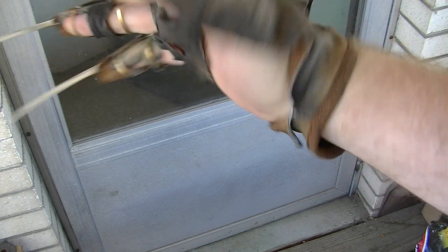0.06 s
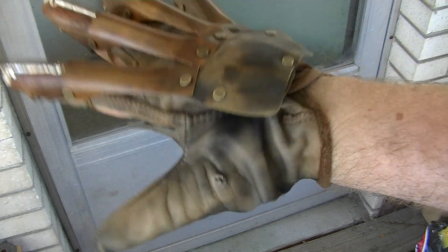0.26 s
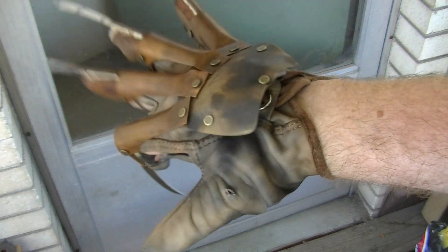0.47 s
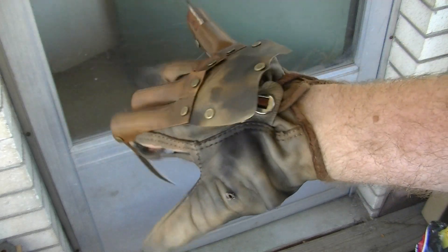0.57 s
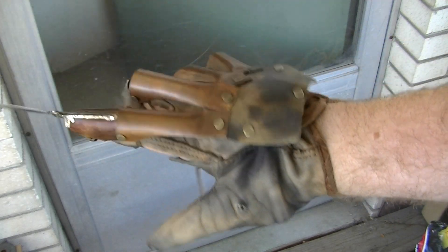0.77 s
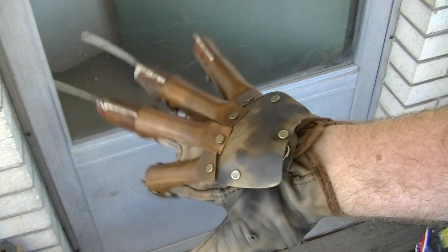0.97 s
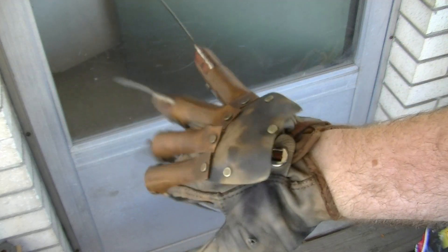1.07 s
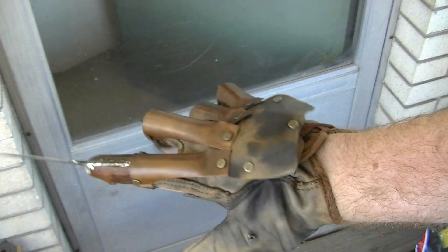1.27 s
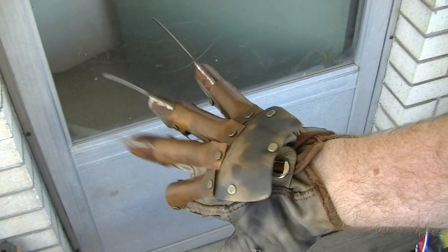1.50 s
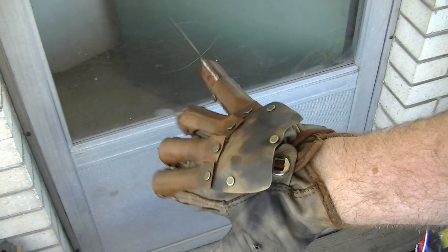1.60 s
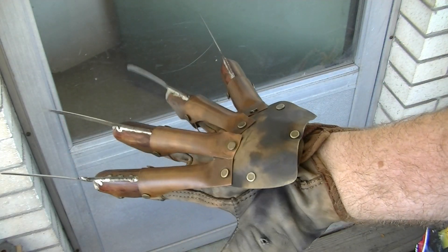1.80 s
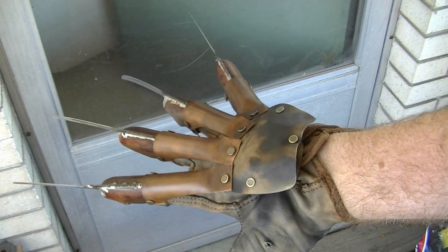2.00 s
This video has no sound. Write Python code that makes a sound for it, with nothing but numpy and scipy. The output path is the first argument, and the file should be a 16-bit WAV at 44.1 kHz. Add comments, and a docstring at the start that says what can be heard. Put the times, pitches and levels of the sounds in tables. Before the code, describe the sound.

Close metallic clacking and rattling of a bladed glove's jointed fingers, over soft outdoor air

```python
"""First come faint ticks over soft outdoor air and a low hum, then a metal-plated glove flexes close by.
Its steel blades clack, its finger plates knock and tap, and its rivets and joints tick.
Edges scrape in short stick-slip runs, and the leather crackles softly. A distant bird whistles near the end.
Each metal contact is a tiny push that sets plates and blades ringing; nearby walls add a brief echo."""
import sys
import numpy as np
from scipy import signal
from scipy.fft import rfft, irfft
from scipy.io import wavfile
from scipy.ndimage import map_coordinates

SR = 44100
rng = np.random.default_rng(int(sys.argv[2]) if len(sys.argv) > 2 else 0)


def store_wav(level_fs):
    """Save 16-bit WAV to argv[1]."""
    pcm = np.round(np.clip(np.atleast_2d(level_fs), -1, 1) * 32767)
    wavfile.write(sys.argv[1], SR, pcm.T.astype(np.int16))


N = 90404  # samples in the whole scene


def undb(db):
    """Turn decibels into a gain."""
    return 10 ** (np.asarray(db) / 20)


def unit(x):
    """Scale a sound to an energy of one."""
    return x / np.sqrt(np.sum(x ** 2) + 1e-18)


def seconds(length):
    """Give the time of every sample in a sound of this length."""
    return np.arange(max(int(length * SR), 2)) / SR


def fade(t, t60):
    """Die away exponentially, losing 60 dB in t60 seconds."""
    return np.exp(-np.log(1000) * t / t60)


def follow(t, points):
    """Draw a level curve through (t/s, level/dB) points and return it as a gain."""
    times, db = np.array(points).T
    return undb(np.interp(t, times, db))


def colour(x, points, size=4096):
    """Filter a sound through (f/Hz, level/dB) points without any sound arriving early."""
    hz, db = np.array(points, float).T
    f = np.maximum(np.arange(size // 2 + 1) * SR / size, 1)
    gain = undb(np.interp(np.log(f), np.log(hz), db))
    # Folding the cepstrum forward makes the filter minimum-phase.
    cepstrum = irfft(np.log(gain))
    cepstrum[1:size // 2] *= 2
    cepstrum[size // 2 + 1:] = 0
    response = irfft(np.exp(rfft(cepstrum)))
    return signal.fftconvolve(x, response)[:len(x)]


def add(out, start, x):
    """Mix a sound in at a time in seconds."""
    i = int(start * SR)
    out[i:i + len(x)] += x[:len(out) - i]


def stereo(first, second, left_db, likeness=1):
    """Blend two sounds into left and right channels of a chosen likeness, leaning to one side."""
    c = np.clip(likeness, 0, 1)
    mid = np.sqrt((1 + c) / 2) * first
    side = np.sqrt((1 - c) / 2) * second
    return np.array([(mid + side) * undb(left_db / 2), (mid - side) * undb(-left_db / 2)])


# Tone of the outdoor air, before its overall level is set: f/Hz, level/dB (per Hz)
AIR_COLOUR = [(25, -21), (60, -7.5), (130, -5), (300, 0.5), (480, -4), (950, -7), (1700, -13.5),
              (3500, -31), (7000, -33.5), (11500, -34.5), (16000, -74.5)]
AIR_DB, AIR_LEFT_DB, AIR_LIKENESS = -51, -6, 0.047


def outdoor_air():
    """Air is steady filtered noise, almost unrelated in the two channels."""
    noises = [colour(rng.standard_normal(N), AIR_COLOUR) for _ in range(2)]
    first, second = [noise / noise.std() for noise in noises]
    return stereo(first, second, AIR_LEFT_DB, AIR_LIKENESS) * undb(AIR_DB)


# Tones of the machine hum, before the wavering: f/Hz, level/dB
HUM_TONES = [(120, -81), (210.3, -60), (841, -69.5)]
# Wavering of the whole hum: t/s, level/dB
HUM_WAVER = [(0, -4.5), (.3, 1), (.7, -13), (1.1, 3), (1.5, -6.5), (1.8, 6.5), (2.05, 1)]
HUM_LEFT_DB = -11.5


def machine_hum(t):
    """A machine hums as a few fixed tones whose shared level wavers."""
    hum = np.zeros(N)
    for hz, db in HUM_TONES:
        # The root of two makes the listed level an average (RMS) one.
        hum += np.sqrt(2) * undb(db) * np.sin(2 * np.pi * (hz * t + rng.random()))
    hum *= follow(t, HUM_WAVER)
    return stereo(hum, hum, HUM_LEFT_DB)


# Falling bird whistles: t/s, length/s, start f/Hz, end f/Hz, level/dB
BIRD_WHISTLES = [(1.91, 0.071, 3720, 3450, -57), (1.976, 0.084, 3370, 3280, -61.5)]


def distant_bird():
    """Each whistle is a pure tone that slides down in pitch, swelling and fading smoothly."""
    out = np.zeros(N)
    for start, length, from_hz, to_hz, db in BIRD_WHISTLES:
        progress = seconds(length) / length
        pitch = from_hz + (to_hz - from_hz) * progress
        tone = np.sin(2 * np.pi * np.cumsum(pitch) / SR)
        add(out, start, undb(db) * np.sin(np.pi * progress) * tone)
    return out


def chatter(length, size=2048):
    """Hard faces buzz together for an instant, with their spectrum partly evened out."""
    t = seconds(length)
    noise = rng.standard_normal(size)[:len(t)]
    buzz = rfft(noise * undb(0.5 * t / length), size)  # rises by 0.5 dB before the evening-out
    evened = irfft(buzz / np.sqrt(np.abs(buzz) + 1e-9))
    return unit(np.roll(evened, 20)[:size // 2])  # a 20-sample shift keeps the early edge


NEAR_DB, NEAR_T60_S, FAR_DB, FAR_T60_S = -6.5, 0.067, -10.5, 0.15
WALL_DELAY_S, ROOM_LEFT_DB, ROOM_LIKENESS = 0.002, -2.8, 0.033
GLOVE_ECHO_DB, GLOVE_ECHO_S = -4, 0.0027


def fading_echo(t, db, t60):
    """Many small reflections merge into fading noise."""
    return undb(db) * unit(rng.standard_normal(len(t)) * fade(t, t60))


def glove_scatter(t):
    """Sound bouncing off the glove is smeared: an even spectrum with shuffled phases."""
    phase = np.angle(rfft(chatter(GLOVE_ECHO_S), len(t)))
    smear = irfft(np.exp(1j * phase), len(t))
    return undb(GLOVE_ECHO_DB) * smear * fade(t, NEAR_T60_S)


def walls(x):
    """Scatter off the glove is joined by quick reflections from close walls and a weaker, longer tail."""
    t = seconds(0.4)
    sides = []
    for _ in range(2):
        echo = fading_echo(t, NEAR_DB, NEAR_T60_S) + fading_echo(t, FAR_DB, FAR_T60_S)
        late = np.pad(echo, (int(WALL_DELAY_S * SR), 0))[:len(t)]
        tail = glove_scatter(t) + late
        sides.append(signal.fftconvolve(x, tail)[:N])
    return stereo(*sides, ROOM_LEFT_DB, ROOM_LIKENESS)


def slips(count, rate, scatter_db):
    """Sticking and slipping gives random tiny impacts of uneven size and either sign."""
    happens = rng.random(count) < rate / SR
    size = undb(scatter_db * np.clip(rng.standard_normal(count), -2, 2))
    return happens * np.sign(rng.standard_normal(count)) * size


# Loudness of the creaking leather and joints: t/s, level/dB
CREAK_LEVEL = [(0, -69), (.2, -61), (.44, -63), (.56, -54), (.7, -46.5), (1.0, -57), (1.15, -56),
               (1.32, -49.5), (1.5, -60.5), (1.76, -56), (1.86, -53), (2.05, -79)]
# Tone of the creaking: f/Hz, level/dB
CREAK_COLOUR = [(200, -42), (900, -1.5), (1400, -1), (2200, 5), (3200, 5.5), (6500, -6), (11000, -8),
                (15500, -9.5)]
CREAKS_PER_S, CREAK_SCATTER_DB, CREAK_T60_S = 1500, 3.5, 0.024


def leather(t):
    """The flexing glove crackles finely: every slip is a short, unpitched rustle."""
    power = slips(N, CREAKS_PER_S, CREAK_SCATTER_DB) ** 2
    fading_power = signal.fftconvolve(power, fade(t, CREAK_T60_S) ** 2)[:N]
    rustle = np.sqrt(np.abs(fading_power))
    crackle = colour(rustle * rng.standard_normal(N), CREAK_COLOUR)
    return crackle / crackle.std() * follow(t, CREAK_LEVEL)


# Dull taps of plates lying on the leather: t/s, level/dB, middle f/Hz
PLATE_TAPS = [(0.5126, -14, 1294), (0.5115, -20, 2200), (0.568, -14, 1410), (0.568, -12.5, 2210),
              (.603, -15.5, 704), (0.609, -10.5, 2500), (.666, -12, 1215), (0.8912, -15.5, 1310),
              (.926, -6, 2175), (1.1154, -21, 2120), (1.142, -33, 2250), (1.426, -5.5, 1590),
              (1.66, -20, 2170), (1.722, -29, 2210), (1.786, -11, 1346), (1.785, -6.5, 2075)]
TAP_T60_S, TAP_ATTACK_S = 0.034, 0.0015
TAP_SPREAD = 0.096  # pitch step between neighbouring modes, as a share of the middle one


def taps():
    """A plate damped by leather gives three close, short-lived modes."""
    out, t = np.zeros(N), seconds(0.1)
    shape = fade(t, TAP_T60_S) * (1 - np.exp(-t / TAP_ATTACK_S))
    for start, db, hz in PLATE_TAPS:
        modes = np.zeros(len(t))
        for k in (-1, 0, 1):
            phase = hz * (1 + TAP_SPREAD * k) * t + abs(k) * rng.random()
            modes += undb(-6 * abs(k)) * np.sin(2 * np.pi * phase)  # outer modes are 6 dB weaker
        add(out, start, undb(db) * unit(modes * shape))
    return out


MODE_SCATTER_DB = 1


def ringing(t, modes, spread, parts=3):
    """Several similar parts ring together; pitch and strength shift from contact to contact."""
    total = np.zeros(len(t))
    for _ in range(parts):
        for hz, db, t60 in modes:
            strength, detune, phase = rng.standard_normal(3)
            tone = np.sin(2 * np.pi * (hz * (1 + spread * detune) * t + phase))
            total += undb(db + MODE_SCATTER_DB * strength) * unit(tone * fade(t, t60))
    return unit(total)


PLATE_CLANK_HZ, PLATE_CLANK_WIDTH_HZ, PLATE_CLANK_DB, PLATE_CLANK_T60_S = 2000, 3200, -4.5, 0.059
PLATE_SPREAD = 0.0966


def plate_clank(t):
    """A plate clanks as fading noise through one broad resonance."""
    hz = PLATE_CLANK_HZ * (1 + PLATE_SPREAD * rng.uniform(-2.1, 1))  # each plate has its own size
    band = signal.iirpeak(hz, hz / PLATE_CLANK_WIDTH_HZ, fs=SR)
    noise = unit(rng.standard_normal(len(t)) * fade(t, PLATE_CLANK_T60_S))
    return 2 * undb(PLATE_CLANK_DB) * signal.lfilter(*band, noise)


# Ringing tones of the blades, before random shifts: f/Hz, level/dB, t60/s
BLADE_MODES = [(3664, 7, 0.086), (7730, 8, 0.057), (9770, -1, 0.053), (12100, -2.5, 0.045),
               (12550, 4, 0.076)]
# Ringing tones of the finger plates, before random shifts: f/Hz, level/dB, t60/s
PLATE_MODES = [(1306, -6, 0.11), (1872, -6, 0.048), (2130, 3, 0.15), (2249, 4, 0.19), (4520, -13, 0.14),
               (6480, -5, 0.25)]
BLADE_MODE_SPREAD, PLATE_MODE_SPREAD, PLATE_RING_DB = 0.0113, 0.027, -14
BASS_HZ, THUD_HZ, PLATE_LOW_HZ, PLATE_HIGH_HZ, BLADE_HZ, EDGE_HZ = 159, 603, 1344, 2270, 5240, 7500
BRIGHT_HZ, BRIGHT_END_HZ = 12400, 14900
BLADE_EDGE_RATIO, BLADE_SKIRT_DB = 1.4, -1.5
CLACK_BASS_DB, LIGHT_BASS_DB = 11, -5.5


def contact(push, db, thud_db, plate_db, blade_db, ring_db, blade_hz=BLADE_HZ, bright_db=0,
            plate_ring_db=PLATE_RING_DB, bass_db=LIGHT_BASS_DB):
    """A push on metal gives its own crack, a short plate clank and the ringing of plates and blades."""
    t = seconds(0.3)
    blades = undb(ring_db) * ringing(t, BLADE_MODES, BLADE_MODE_SPREAD)
    plates = undb(plate_ring_db) * ringing(t, PLATE_MODES, PLATE_MODE_SPREAD)
    body = (blades + plates) / 2 + plate_clank(t)
    body[0] += 1  # the push itself is heard as the crack
    tone = [(BASS_HZ, thud_db + bass_db), (THUD_HZ, thud_db),
            (PLATE_LOW_HZ, plate_db), (PLATE_HIGH_HZ, plate_db),
            (blade_hz / BLADE_EDGE_RATIO, (plate_db + blade_db) / 2 + BLADE_SKIRT_DB),
            (blade_hz, blade_db),
            (blade_hz * BLADE_EDGE_RATIO, blade_db / 2 + BLADE_SKIRT_DB),
            (EDGE_HZ, 0), (BRIGHT_HZ, bright_db), (BRIGHT_END_HZ, 0)]
    struck = unit(signal.fftconvolve(push, body))
    return undb(db) * colour(struck, sorted(tone))


# In the next four tables, levels come before the shared contact colour and the hand level.
# Small ticks of rivets and joints: t/s, level/dB, plate level/dB
JOINT_TICKS = [(.073, -25.5, 13.5), (0.1181, -17.5, 1.5), (0.176, -27.5, 19), (0.2225, -11.5, -3),
               (0.315, -35.5, 23), (0.348, -14, 1), (0.3613, -25.5, 18), (.408, -33, 18), (0.532, -10, -1),
               (.548, -7, -7), (0.575, -16, -1), (.818, -13, -3), (.850, -20.5, 19), (.8625, -21, 8),
               (1.023, -13, -1), (1.032, -16.5, 10), (1.0705, -12.5, 0.5), (1.178, -9.5, 2),
               (1.3068, -17, -9), (1.5256, -31, 23), (1.562, -18, 1), (1.640, -19.5, 7), (1.7, -15, -8),
               (1.742, -15, 4), (1.757, -14.5, 6.5), (1.774, -15, 6.5), (1.8715, -25, 18),
               (1.920, -26.5, 12.5), (2.014, -25.5, 9.5)]
TICK_S, TICK_RING_DB, TICK_BLADE_SHARE = 0.00083, -25, 0.62


def ticks(out):
    """Rivets and joints tick when a very short buzz excites the metal."""
    for start, db, plate_db in JOINT_TICKS:
        blade_db = TICK_BLADE_SHARE * plate_db
        add(out, start, contact(chatter(TICK_S), db, 0, plate_db, blade_db, TICK_RING_DB))


# Edges sliding: t/s, length/s, level/dB, thud level/dB, plate level/dB, blade level/dB,
# swell from start to end/dB, blade resonance f/Hz, brightness level/dB
EDGE_SCRAPES = [(0.515, 0.053, -10.5, 11.5, 11.5, 10.5, 15, 3300, 2),
                (0.596, 0.013, -11.5, 11.5, 14.5, 11, -6, 2970, 5.5),
                (0.658, 0.0093, -18.5, 24, 6, 1, -1, 2900, -3),
                (0.737, 0.008, 9, -16, -13, 8.5, 15, 3270, 5),
                (.745, 0.0099, 17.5, -20, -12, 0.5, -10, 4370, -1.5),
                (0.938, 0.009, -5.5, 2, 15, 4, -9, 4400, -9),
                (0.969, .04, -12.5, -1, 12.5, 11, 15, 4370, -1),
                (1.108, 0.068, -10, 16, 9.5, 17.5, 0, 2900, 0), (1.2, 0.024, 0.5, -18, 2, 6, -15, 3660, 0),
                (1.231, 0.016, 7, -36, -3.5, 5, 1, 3860, 3),
                (1.2468, 0.01, 9, -38, -7, 3.5, -18, 4500, 1.5),
                (1.34, 0.014, -8, -5, 8, -0.5, -13, 4280, -1),
                (1.473, 0.018, -19.5, -7, 15, 12, 16, 4400, -2),
                (1.572, 0.019, -12.5, 8.5, 17, 3, -11, 3100, -6),
                (1.612, 0.015, -22.5, 13, 17, 17, -3, 3120, 2),
                (1.703, 0.019, -17.5, -8, 16, 10.5, 9, 3400, 4)]
SLIPS_PER_S, SLIP_SCATTER_DB, SCRAPE_ATTACK_S, SCRAPE_RING_DB = 6000, 1.5, 0.00144, -11


def scrapes(out):
    """Sliding edges stick and slip, hitting the metal with a swelling or fading run of tiny impacts."""
    for start, length, *strike, swell_db, blade_hz, bright_db in EDGE_SCRAPES:
        t = seconds(length)
        swell = undb(swell_db * t / length) * (1 - np.exp(-t / SCRAPE_ATTACK_S))
        push = slips(len(t), SLIPS_PER_S, SLIP_SCATTER_DB) * swell
        add(out, start, contact(push, *strike, SCRAPE_RING_DB, blade_hz, bright_db))


# Finger plates knocking: t/s, level/dB, thud level/dB, plate level/dB, blade level/dB, rattle length/s
PLATE_KNOCKS = [(0.2096, -12.5, -23, -1, 6, 0.00083), (0.2148, -4.5, -13, 2, 2, 0.0022),
                (.2370, -13.5, -2, 9.5, 11, 0.0024), (0.496, -1.5, -11, 4.5, -2.5, 0.0037),
                (0.499, -9, -1, 5, 7, 0.0019), (0.5049, -8, 8, 11, 4, 0.0019),
                (0.5122, -4, -5, 11, 0.5, 0.0036), (0.525, -5, 6, -7, -7, 0.0021),
                (0.565, -9.5, 19, 13.5, -3, 0.0036), (0.8543, -5.5, 5, 10.5, -1, 0.0039),
                (0.9244, 9.5, -25, -4, 3, 0.0038), (0.9281, 7, 6, -0.5, 1.5, 0.0061),
                (0.9593, 6.5, -9, 6.5, 5.5, 0.0026), (1.065, -11, 6, 13, 9, 0.0031),
                (1.1147, -4, 12, 13, -1, 0.0031), (1.129, -11.5, 15, 10, -8, 0.00077),
                (1.4218, 11, -18, -2, -2, 0.0031), (1.4249, 1.5, 0.5, 1, 6.5, 0.015),
                (1.4638, -4.5, -11, 10.5, 9, 0.0021), (1.4997, 0.5, -18, 0, 1, 0.0024),
                (1.57, -8.5, -3.5, 8, -4, 0.0014), (1.6567, -14.5, -1, 7, 3.5, 0.0032),
                (1.6666, -7.5, 0, 3, -4, 0.0024), (1.72, -22.5, 6, 15.5, 4.5, 0.0038),
                (1.788, 6.5, -1, -1, -17, 0.0017)]
KNOCK_RING_DB = -21


def knocks(out):
    """Finger plates knock when a short rattle excites the metal."""
    for start, *strike, length in PLATE_KNOCKS:
        add(out, start, contact(chatter(length), *strike, KNOCK_RING_DB))


# Blades snapping together: t/s, level/dB, thud level/dB, plate level/dB, blade level/dB,
# blade ring level/dB, blade resonance f/Hz, brightness level/dB, plate ring level/dB
BLADE_CLACKS = [(0.352, -8.5, 4, 1, -1.5, -27, 5180, 6, -15),
                (0.6655, 11.5, -23, -13, 2, 1.5, 3150, 2.5, -27),
                (0.8894, 10, -9.5, -6.5, 7.5, -25, 5200, 5, -6),
                (1.1929, 9.5, -4.5, -0.5, -0.5, -3, 4100, 3.5, -12),
                (1.3901, 12, 1.5, -6, 3.5, -20, 5140, -1, -5.5),
                (1.7832, 10, -12, -6.5, 9.5, -3, 5000, 3, 0)]
CLACK_S = 0.00043


def clacks(out):
    """Blades snap together in an instant, with more bass than the lighter contacts."""
    for start, *strike in BLADE_CLACKS:
        add(out, start, contact(chatter(CLACK_S), *strike, CLACK_BASS_DB))


# Tone shared by all metal contacts: f/Hz, level/dB
CONTACT_COLOUR = [(50, -28), (150, -20.5), (500, -11.5), (950, -9.5), (1350, -5.5), (1750, -9.5),
                  (2150, -2.5), (2800, -8.5), (3700, -5.5), (5100, -6.5), (6600, -10), (7800, -3),
                  (9500, -1), (11300, 3), (12600, -6), (14200, -9), (15400, -12.5), (16500, -17)]


def glove():
    """Join all ticks, scrapes, knocks and clacks and give them one shared tone."""
    out = np.zeros(N)
    for play in (ticks, scrapes, knocks, clacks):
        play(out)
    return colour(out, CONTACT_COLOUR)


HAND_DB, LEFT_DB, LEFT_LAG_S = 0.5, -2.2, 0.000009


def scene():
    """The glove sits a little to the right: its sound is weaker and slightly later on the left."""
    t = np.arange(N) / SR
    background = outdoor_air() + machine_hum(t) + distant_bird()
    hand = undb(HAND_DB) * glove() + taps() + leather(t)
    delayed = map_coordinates(hand, [(t - LEFT_LAG_S) * SR], order=5)
    direct = np.array([delayed * undb(LEFT_DB / 2), hand * undb(-LEFT_DB / 2)])
    return direct + walls(hand) + background


DUCK_FROM_DB, DUCK_ATTACK_S, DUCK_RELEASE_S, DUCK_SLOPE = -36, 0.0032, 0.049, 0.47
PEAK_LIMIT, TOP_HZ = 0.8, 15800


def record(dry):
    """Automatic gain falls as the smoothed power rises; then peaks are rounded and the top is cut."""
    power = np.mean(dry ** 2, axis=0)
    for lag in (DUCK_ATTACK_S, DUCK_RELEASE_S):  # two smoothers in a row
        keep = np.exp(-1 / (lag * SR))
        power = signal.lfilter([1 - keep], [1, -keep], power)
    gain = (1 + power / undb(DUCK_FROM_DB) ** 2) ** (-DUCK_SLOPE / 2)
    rounded = PEAK_LIMIT * np.tanh(dry * gain / PEAK_LIMIT)
    low_pass = signal.ellip(8, 0.2, 70, TOP_HZ, fs=SR, output="sos")
    return signal.sosfilt(low_pass, rounded)


dry = scene()
out = record(dry)
store_wav(out)
```